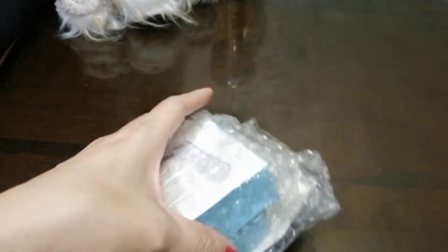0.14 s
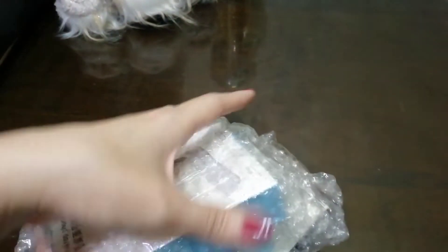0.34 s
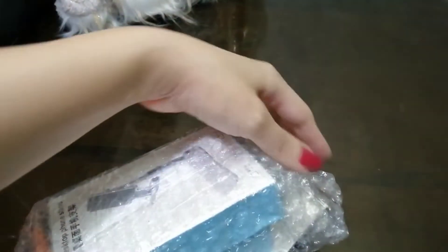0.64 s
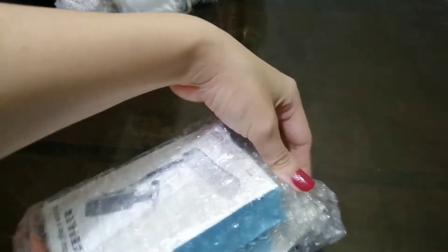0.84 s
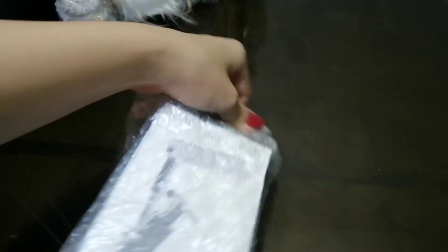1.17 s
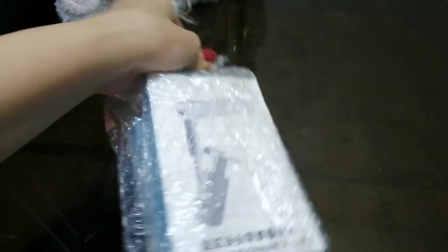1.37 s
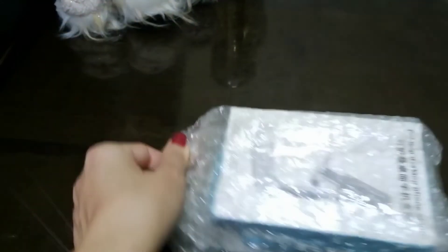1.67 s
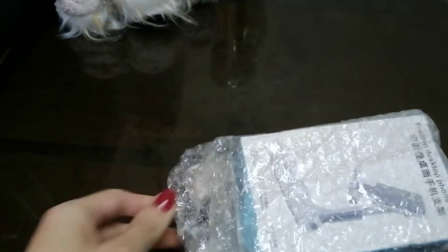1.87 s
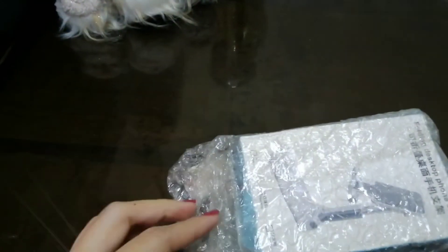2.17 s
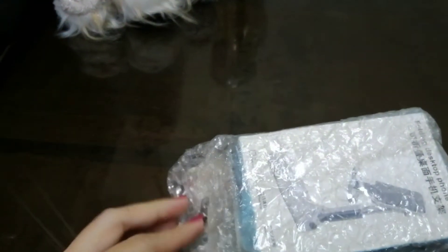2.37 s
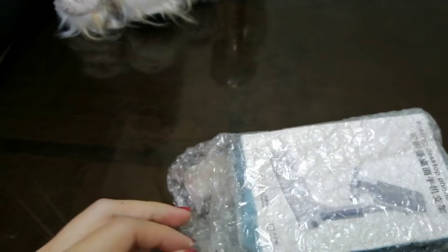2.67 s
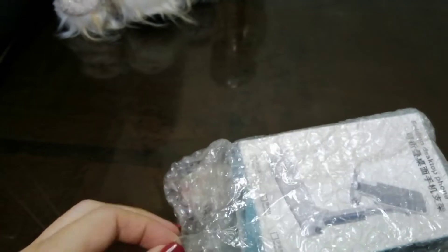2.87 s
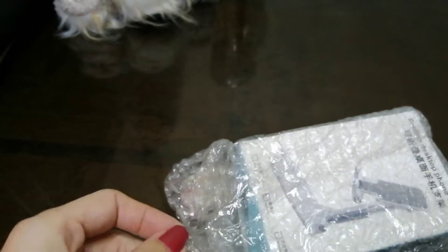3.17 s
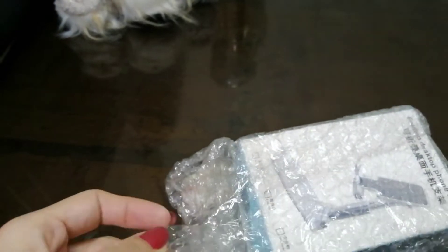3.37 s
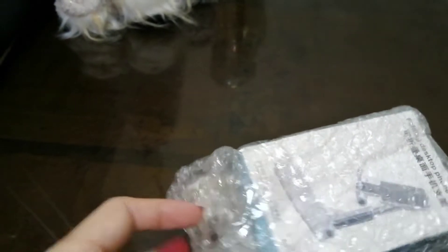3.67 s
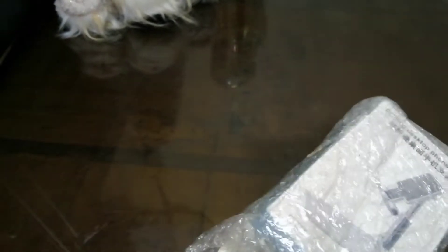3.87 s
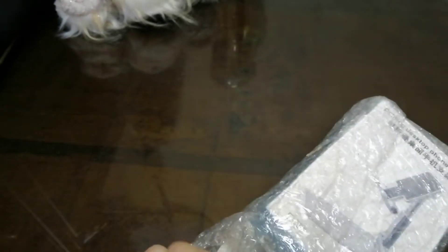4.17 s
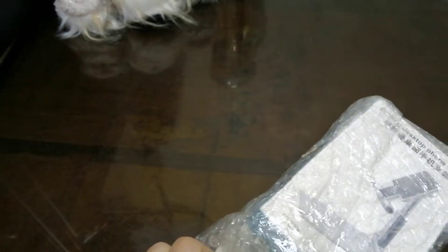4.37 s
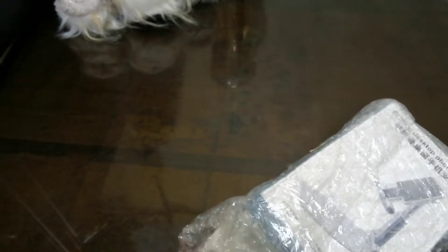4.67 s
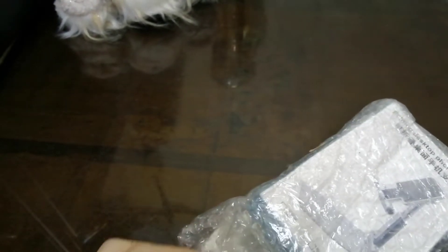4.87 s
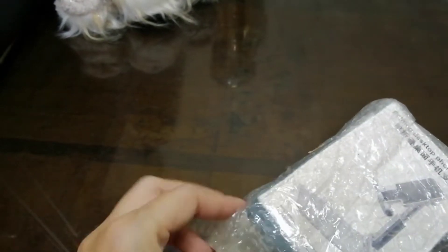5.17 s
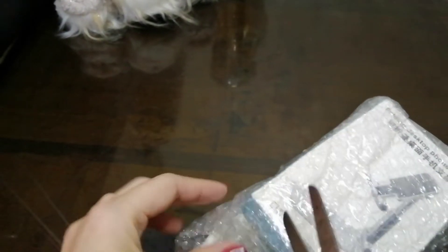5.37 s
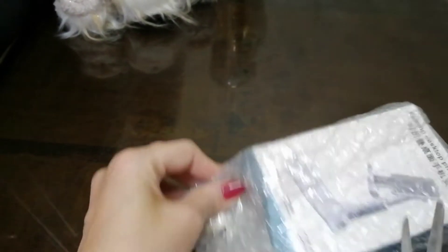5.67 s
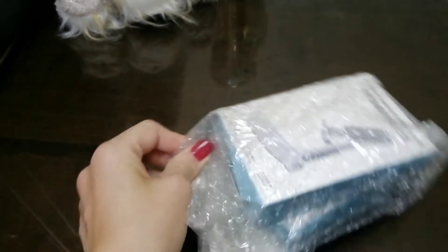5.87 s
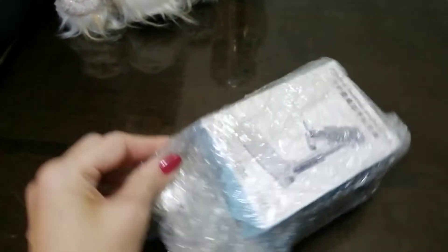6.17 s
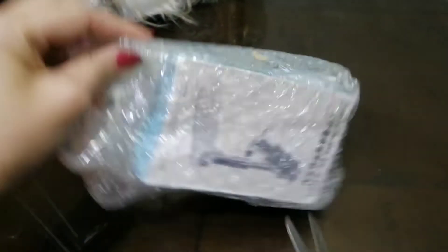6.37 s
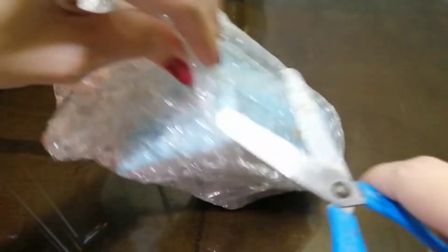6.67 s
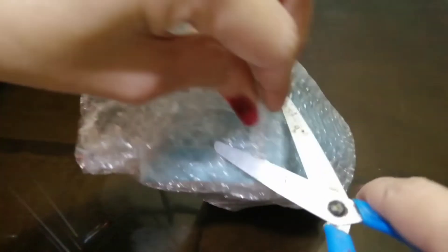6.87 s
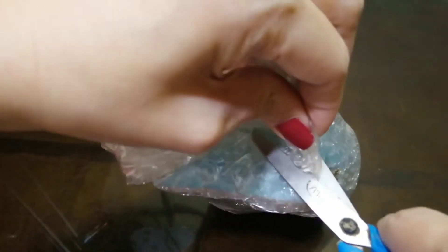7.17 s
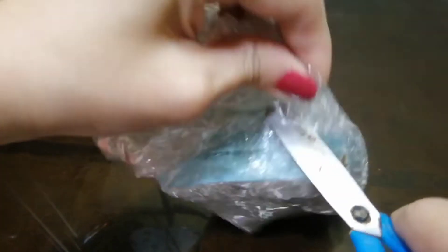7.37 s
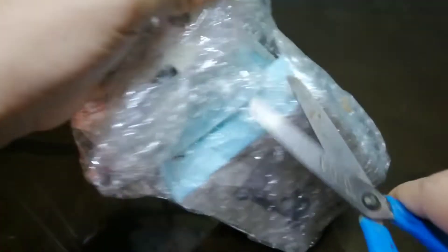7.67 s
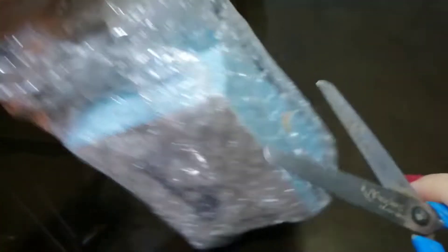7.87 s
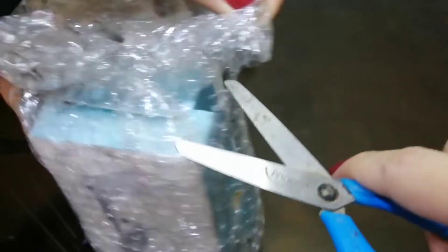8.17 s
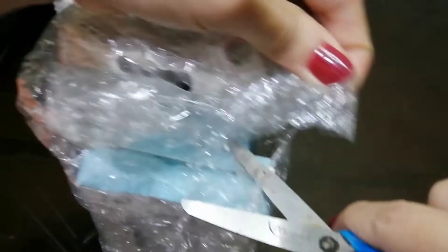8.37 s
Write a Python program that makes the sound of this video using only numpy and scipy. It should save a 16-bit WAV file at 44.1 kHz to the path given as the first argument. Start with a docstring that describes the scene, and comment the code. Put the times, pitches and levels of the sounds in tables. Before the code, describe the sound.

Hands handle a box in bubble wrap close to the microphone in a small, fairly dry room. Two sharp snaps open the sound, followed by bright crinkling that comes in bursts with each grasp. From about 0.7 to 1.9 seconds the plastic crackles busily, with loud snaps, duller creaks and small pops. It eases around 2 seconds, then rustles on with scattered clicks from 2.7 to 4. At 4.5 seconds tape lets go in a very short run of cracks. The crinkling swells again between 5.2 and 6 seconds. Around 7 seconds scissors faintly shear the film, and a dense flurry of snaps and pops lasts until about 7.8. Lighter crinkling continues to the end at 8.5 seconds, drifting slightly left. Faint traffic rumbles through the walls throughout, and a far engine revs softly at about 5.9, 6.7 and 7.7 seconds.

```python
"""Unwrapping a box in bubble wrap

Hands turn and unwrap a box on a table in a small room, close to a phone with two unlike microphones.
The film buckles in swarms of tiny crackles and louder snaps; air pockets and box panels pop under the
fingers, tape lets go in a short run of slips and scissors shear the film.
Traffic rumbles through the walls and a far engine revs three times."""
import sys
import numpy as np
from scipy import signal
from scipy.fft import rfft, irfft, next_fast_len
from scipy.io import wavfile
from scipy.ndimage import uniform_filter1d, map_coordinates

SR = 44100
rng = np.random.default_rng(int(sys.argv[2]) if len(sys.argv) > 2 else 0)


def log_audio(samples):
    """Write samples as a 16-bit WAV file to the path given in sys.argv[1]."""
    # one column per channel
    frames = np.atleast_2d(samples).T
    # limit to full scale, then quantise
    limited = np.clip(frames, -1, 1)
    pcm = np.round(limited * 32767).astype(np.int16)
    wavfile.write(sys.argv[1], SR, pcm)


N = 376173

# each grasp, pull or turn of the wrap: full_at_s, rise_s, hold_s, crackle_db, creak_db
HAND_MOVES = [(0.034, 0.061, 0.11, -49.5, -61.5), (0.332, 0.045, 0.035, -53.5, -55),
              (0.715, 0.024, 0.17, -47.5, -58), (0.875, 0.042, .43, -42, -52.5),
              (1.014, 0.072, 0.015, -43.5, -41.5), (1.457, 0.15, 0.034, -54.5, -48.5),
              (1.614, 0.14, 0.14, -47, -49), (1.81, 0.03, 0.04, -45, -52.5), (2.034, 0.11, 0.47, -59, -67),
              (2.406, 0.017, 0.062, -52.5, -59.5), (2.739, 0.13, 0.26, -48, -61),
              (3.087, 0.052, 0.33, -46, -59), (3.541, 0.037, 0.24, -49, -59.5),
              (3.833, 0.031, 0.12, -55.5, -53.5), (4.389, 0.11, 0.03, -43, -55.5),
              (4.536, 0.045, 0.027, -43, -50), (4.774, 0.1, 0.0096, -46.5, -53.5),
              (5.191, 0.06, 0.19, -47.5, -58.5), (5.528, 0.081, 0.16, -42, -48),
              (5.616, 0.035, 0.36, -42, -52.5), (6.086, 0.074, 0.15, -50.5, -50),
              (6.529, 0.32, 0.063, -51, -54.5), (7.09, 0.51, 0.22, -51, -56.5),
              (7.276, 0.067, 0.045, -47, -49), (7.434, 0.13, 0.11, -49.5, -51.5),
              (7.68, 0.036, 0.12, -50, -58.5), (8.11, 0.069, 0.019, -49.5, -52.5),
              (8.52, 0.4, .05, -46.5, -55.5)]
# single loud buckles: start_s, level_db, bright_edge_relative_db
FILM_SNAPS = [(0.0054, -18.5, -2), (0.018, -17.5, -7), (0.212, -33.5, -3.5), (0.3289, -36, 8),
              (0.5035, -57, 7), (0.564, -51, 6), (0.589, -38.5, -2), (0.637, -41.5, 4.5), (0.704, -36, -9),
              (0.8585, -19, -19), (0.9293, -30.5, 2.5), (0.962, -36, -3), (1.034, -25, -5),
              (1.055, -26, -5), (1.0878, -34, 0), (1.1356, -36, 5.5), (1.195, -31.5, 7.5),
              (1.453, -25.5, -15), (1.7537, -22, -16), (1.8108, -20, -28), (1.8316, -23, -12),
              (2.015, -43.5, -2), (2.1014, -47, 6.5), (2.169, -43, 8.5), (2.218, -45, 4), (2.377, -46, 3),
              (2.415, -36, -1), (2.4946, -42.5, 9.5), (2.641, -44, 7), (2.7264, -32.5, 0.5),
              (2.93, -30, -0.5), (3.259, -44, 9), (3.5375, -31, 1.5), (3.785, -37.5, -1), (3.962, -33, -3),
              (4.6178, -33, 1.5), (4.794, -38.5, 13.5), (5.151, -46, 14.5), (5.627, -21, -8),
              (5.71, -32.5, 4), (6.9955, -43.5, 10.5), (7.026, -45, 8), (7.089, -37, 11), (7.1267, -36, 11),
              (7.147, -34, 10), (7.19, -42.5, 12), (7.194, -35, 5), (7.2245, -42, 10), (7.246, -32.5, 6),
              (7.268, -29.5, 6), (7.309, -27, 1), (7.33, -19.5, -0.5), (7.447, -26.5, -6),
              (7.4716, -27, 1.5), (7.475, -24, 4), (7.5573, -28.5, -3), (7.628, -32, -3.5),
              (7.698, -34, 1.5), (7.738, -32, -8), (8.177, -37, -4)]
# air pockets and box panels popping under the fingers: start_s, level_db, pitch_hz
FINGER_POPS = [(0.019, -35, 1196), (0.857, -34, 940), (1.021, -32, 1680), (1.104, -35, 1750),
               (1.454, -35, 2164), (1.69, -35, 518), (1.69, -31.5, 3110), (1.704, -40, 480),
               (1.752, -37, 1230), (1.752, -29.5, 2900), (2.727, -38.5, 1200), (3.025, -44.5, 904),
               (3.191, -43, 1010), (4.31, -50, 795), (4.706, -45.5, 1104), (4.76, -44, 757),
               (4.823, -45.5, 1280), (5.53, -32, 775), (6.18, -35, 1690), (6.514, -29, 1814),
               (6.517, -30, 2786), (7.302, -31, 1300), (7.329, -27.5, 1180), (7.473, -30, 372),
               (7.4743, -26.5, 1690), (7.629, -38, 1480), (7.737, -28.5, 2800), (8.496, -40.5, 380)]
# tape letting go of the film: start_s, level_db
TAPE_SLIPS = [(4.503, -23.5), (4.513, -26.5), (4.526, -27.5), (4.5359, -24.5), (4.547, -27),
              (4.5545, -26.5)]
# resonances of the taped panel: centre_hz, width_hz, gain_db
PANEL_MODES = [(1550, 110, -6), (3100, 360, 8), (5500, 5100, 1), (11000, 5800, 0.5)]
# the wrap drifting towards the left microphone: time_s, left_gain_db
WRAP_DRIFT = [(0, -5), (2, -2), (6.5, -2.5), (8.53, 3.5)]
# decay of the small room: frequency_hz, t60_s
ROOM_DECAY = [(300, 0.12), (3000, 0.13), (12000, 0.019)]
# the far engine at the top of each rev: time_s, firing_hz, level_db
ENGINE_REVS = [(5.87, 39.55, -49.5), (6.73, 37.59, -52.5), (7.661, 42.3, -53.5)]
# harmonics of the firing rate: multiple, gain_db
ENGINE_ORDERS = [(1, -0.5), (2, 2.5), (3, -9.5)]
# traffic heard through the walls: time_s, rumble_db, drone_db
TRAFFIC_LEVELS = [(0.15, -57, -52.5), (0.7, -52.5, -56), (1.88, -61, -84), (2.18, -53.5, -69),
                  (2.62, -54.5, -55), (3.28, -53.5, -69), (4.03, -50.5, -56.5), (4.8, -58.5, -65),
                  (5.82, -49.5, -67), (6.78, -52, -50.5), (7.22, -58.5, -63), (8.5, -56, -62.5)]
# spectra of traffic rumble, traffic drone and room tone: frequency_hz, relative_density_db
RUMBLE_SPECTRUM = [(12, -52), (24, 1), (38, -3.5), (120, -9), (300, -63)]
DRONE_SPECTRUM = [(90, -20), (170, -1), (230, -17), (500, -37.5)]
ROOM_TONE_SPECTRUM = [(20, -8.5), (350, 0), (800, -11.5), (2000, -17), (4000, -20.5), (9000, -78)]
# how alike the background is at the two microphones: frequency_hz, correlation
MIC_LIKENESS = [(100, 0.94), (350, 0.9), (800, 0.27), (1400, 0.026)]
# colour of each channel (microphone resonances, then treble cut off near 15.8 kHz): frequency_hz, gain_db
LEFT_COLOUR = [(20, -4.5), (2200, -8), (3100, -6), (4000, -10), (5200, -4.5), (6500, -3.5), (8300, 2.5),
               (9500, -4), (14000, -12.5), (15100, -3), (15750, -9), (15950, -83)]
RIGHT_COLOUR = [(20, 3.5), (2200, -3.5), (3100, -1), (4000, -6), (4600, -0.5), (5200, 4.5), (6000, 6),
                (7000, 11.5), (8000, -2.5), (10500, -5), (13500, -4.5), (15000, 6), (15750, -21),
                (15950, -40)]


def crackle():
    """Close up, each move of the hands sets off bright buckles with their hiss, and duller creaks."""
    folds = rng.random(N) * (rng.random(N) < 30 / SR)  # about 30 folds give way a second
    runs = signal.lfilter([1], [1, -np.exp(-1 / (0.017 * SR))], folds)  # each starts a fading run
    clump_db = 5 * runs + 1.5 * wobble(140)
    bright = buckles(count=11000, lo_hz=2610, hi_hz=17400, cycles=3.5, spread_db=3.5, drift=0.3, size=64)
    creases = buckles(count=700, lo_hz=5030, hi_hz=14200, cycles=0.68, spread_db=3.5, drift=0, size=24)
    hiss = unit(band(rng.standard_normal((2, N)), 2700, 19100))
    dull = buckles(count=6500, lo_hz=700, hi_hz=2984, cycles=2.75, spread_db=3.5, drift=0.271, size=512)
    rub = unit(band(rng.standard_normal((2, N)), 470, 4030))  # film gliding on film
    crackles = unit(amp(clump_db) * (bright + amp(2) * hiss + amp(-6) * creases))
    creaks = unit(amp(clump_db + 1.44 * wobble(25)) * (dull + amp(-3.5) * rub))
    crackle_gain, creak_gain = hand_gains()
    return crackle_gain * crackles + creak_gain * creaks


def buckles(count, lo_hz, hi_hz, cycles, spread_db, drift, size):
    """Film buckles as damped flicks of size samples; with drift, pitch wanders as folds change size."""
    when, pitch, phase, force, side = rng.random((count, 5)).T[:, :, None]
    fold = wobble(14)[(when * N).astype(int)]
    hz = np.minimum(lo_hz * (hi_hz / lo_hz) ** pitch * np.exp(drift * fold), SR / 2)
    t = np.arange(size) / SR
    flick = np.sin(2 * np.pi * (hz * t + phase)) * np.exp(-hz * t / cycles) * np.sqrt(hz)
    strength = amp(-spread_db * np.log(1 - 0.993 * force))  # most are small, a few far larger
    return unit(place(when * N / SR, flick * strength, lag=24 * side - 17))


def hand_gains():
    """Gains of crackle and creak: every move climbs, slackens while held and lets go; powers add."""
    full_at_s, rise_s, hold_s, crackle_db, creak_db = np.array(HAND_MOVES).T[:, :, None]
    rise_db, sag_db_per_s, release_db_per_s = 14, 10, 231
    grid = np.arange(0, N + 32, 32)
    t = grid / SR - full_at_s
    shape_db = (rise_db * np.minimum(t, 0) / rise_s
                - sag_db_per_s * np.maximum(t, 0)
                - release_db_per_s * np.maximum(t - hold_s, 0))

    def gain(move_db, settling_db):  # between moves the film settles by itself
        power = (amp(move_db + shape_db) ** 2).sum(0) + amp(settling_db) ** 2
        return np.interp(np.arange(N), grid, np.sqrt(power))
    return gain(crackle_db, settling_db=-75), gain(creak_db, settling_db=-66.5)


def snaps():
    """Each snap is a sharp crack that rings one patch of film, with a faint rattling tail."""
    start_s, level_db, edge_db = np.array(FILM_SNAPS).T[:, :, None]
    t = np.arange(1200) / SR
    noise = rng.standard_normal((len(start_s), 4, len(t)))
    rattle = amp(11.6 * uniform_filter1d(noise[:, 2], 20))  # smaller buckles follow unevenly
    envelope = decay(t, 0.0047) + 0.21 * rattle * decay(t, 0.1)
    crack = np.sign(noise[:, :2]) * envelope[:, None]  # full swing from the first instant
    crack[:, :, 0] = 4.3  # the break itself
    patch_hz = 4600 * np.exp(0.36 * noise[:, 3, :1])
    patch = 0.24 * np.sin(2 * np.pi * patch_hz * t) * decay(t, 0.039)
    lag = 5 * noise[:, 3, 1] - 5
    core = place(start_s, amp(level_db) * (crack[:, 0] + patch), lag)
    edge = place(start_s, amp(level_db + edge_db) * crack[:, 1], lag)
    return band(core, 2700, 5880) + band(edge, 5930, 14700)


def pops():
    """A pocket or panel rings briefly at its pitch and one overtone, roughened by the film around it."""
    start_s, level_db, pitch_hz = np.array(FINGER_POPS).T[:, :, None]
    t = np.arange(1500) / SR
    noise = rng.standard_normal((len(start_s), len(t)))
    phase = 2 * np.pi * pitch_hz * t + 0.056 * np.cumsum(noise, 1)
    ring = (np.sin(phase) + 0.3 * np.sin(1.2 * phase)) * decay(t, 1 / (pitch_hz / 70 + 16))
    scuff = 2.38 * uniform_filter1d(noise, 13) * np.cos(phase) * decay(t, 0.048)
    attack = 1 - np.exp(-t / 0.00031)
    popping = place(start_s, amp(level_db) * (ring + scuff) * attack, lag=3 * noise[:, 0] - 5)
    return band(popping, 183, 6200)


def tape():
    """Each slip of the tape cracks into the resonances of the taped panel."""
    start_s, level_db = np.array(TAPE_SLIPS).T[:, :, None]
    t = np.arange(600) / SR
    noise = rng.standard_normal((len(start_s), len(t)))
    crack = np.sign(noise) * decay(t, 0.0048) + 0.41 * noise * decay(t, 0.026)

    def panel(hz):
        return sum((-1) ** k * amp(db) * 1j * hz * width / (centre ** 2 - hz ** 2 + 1j * hz * width)
                   for k, (centre, width, db) in enumerate(PANEL_MODES))
    return filtered(place(start_s, amp(level_db) * crack, lag=-4), panel)


def scissors(start_s=6.93, length_s=0.48, level_db=-54):
    """Blades shear the film: a dry, narrow-band run of tiny ticks that grows as they close."""
    closed = np.clip((np.arange(N) / SR - start_s) / length_s, 0, 1)
    grit = buckles(count=9000, lo_hz=5900, hi_hz=7300, cycles=5, spread_db=6, drift=0, size=96)
    return amp(level_db) * np.sqrt(closed) * (closed < 1) * grit


def room(x):
    """The small room answers with a short tail, duller as it dies, fresh each third of a second."""
    wet = np.zeros((2, N + SR))
    block, delay = SR // 3, 120  # samples
    for at in range(0, N, block):
        hz, t, noise = signal.stft(rng.standard_normal((2, SR // 5)), SR, nperseg=128)
        tail = signal.istft(noise * decay(t, along(ROOM_DECAY, hz)[:, None]), SR, nperseg=128)[1]
        tail /= np.linalg.norm(tail[0])
        answer = signal.fftconvolve(x[:, at:at + block].mean(0)[None], tail, axes=1)
        wet[:, at + delay:at + delay + answer.shape[1]] += answer
    return wet[:, :N]


def engine(fade_db_per_hz=1):
    """A far engine's unsteady firing orders; speed and level fall away on both sides of each rev."""
    top_s, top_hz, top_db = np.array(ENGINE_REVS).T[:, :, None]
    drop_hz = 29.95 * np.abs(np.arange(N) / SR - top_s) ** 1.5
    firing_hz = np.maximum((top_hz - drop_hz).max(0), 20)
    gain = amp(top_db - fade_db_per_hz * drop_hz).max(0)
    phase = 2 * np.pi * np.cumsum(firing_hz) / SR + 0.12 * wobble(7.6)
    orders = sum(amp(db) * np.sin(multiple * phase) for multiple, db in ENGINE_ORDERS)
    return gain * amp(0.82 * wobble(9.6)) * orders


def street():
    """Through the walls, traffic rumble and drone swell separately over the steady room tone."""
    rumble_db, drone_db = curves(TRAFFIC_LEVELS)
    traffic = amp(rumble_db) * ambience(RUMBLE_SPECTRUM) + amp(drone_db) * ambience(DRONE_SPECTRUM)
    return traffic + amp(-61.5) * ambience(ROOM_TONE_SPECTRUM)


def ambience(spectrum):
    """Background noise of rms 1, alike at the two microphones in the bass only."""
    def response(hz):
        angle = np.arccos(along(MIC_LIKENESS, hz)) / 2
        return amp(along(spectrum, hz)) * [np.cos(angle), np.sin(angle)]
    mid, side = filtered(rng.standard_normal((2, N)), response)
    return unit(np.array([mid + side, mid - side]))


def place(start_s, sounds, lag):
    """Sums one sound a row into both microphones; the left hears it lag samples later (minus: sooner)."""
    right = np.round(start_s * SR).astype(int) + np.arange(sounds.shape[1])
    left = np.maximum(right + np.round(lag).astype(int).reshape(-1, 1), 0)
    return np.array([np.bincount(at.ravel(), sounds.ravel(), N + SR)[:N] for at in (left, right)])


def amp(db):
    """Gain of a level in dB."""
    return 10 ** (np.asarray(db) / 20)


def decay(t, t60_s):
    """An envelope that falls 60 dB in t60_s."""
    return amp(-60 * t / t60_s)


def unit(x):
    """x at rms 1."""
    return x / np.sqrt(np.mean(x ** 2) + 1e-20)


def along(points, hz):
    """Rows of frequency_hz, value, read at hz on a log axis."""
    point_hz, values = np.transpose(points)
    return np.interp(np.log(hz + 1), np.log(point_hz + 1), values)


def curves(rows):
    """Each column after time_s, read at every sample."""
    time_s, *columns = np.transpose(rows)
    return [np.interp(np.arange(N) / SR, time_s, column) for column in columns]


def wobble(rate):
    """A smooth random curve, rate knots a second."""
    knots = rng.standard_normal(int(N * rate / SR) + 4)
    return map_coordinates(knots, [np.arange(N) * rate / SR])


def filtered(x, response):
    """x through a complex response of frequency."""
    size = next_fast_len(N + SR // 2)
    return irfft(rfft(x, size) * response(np.fft.rfftfreq(size, 1 / SR)), size)[..., :N]


def band(x, lo_hz, hi_hz):
    """A causal band-pass."""
    return signal.sosfilt(signal.butter(2, [lo_hz, hi_hz], "band", fs=SR, output="sos"), x)


def channel(colour, hz):
    """Causal response of one channel, made by folding the cepstrum of its colour."""
    cepstrum = irfft(np.log(amp(along(colour, hz))))
    half = len(cepstrum) // 2
    return np.exp(rfft(np.r_[cepstrum[0], 2 * cepstrum[1:half], np.zeros(len(cepstrum) - half)]))


def scene():
    """The wrap close by on the table, the room around it, engine and street outside."""
    wrap = crackle() + snaps() + pops() + tape() + scissors()
    wrap[0] *= amp(curves(WRAP_DRIFT)[0])
    return wrap + amp(-10.5) * room(wrap) + engine() + street()


def record(dry):
    """Each of the phone's microphones adds its resonances; then the treble is cut off near 15.8 kHz."""
    def response(hz):
        return np.array([channel(LEFT_COLOUR, hz), channel(RIGHT_COLOUR, hz)]) * (hz < 16650)
    return filtered(dry, response)


dry = scene()
out = record(dry)
log_audio(out)
```